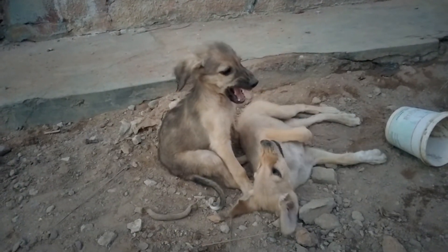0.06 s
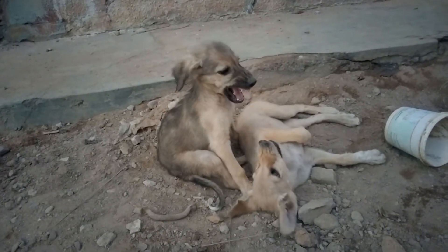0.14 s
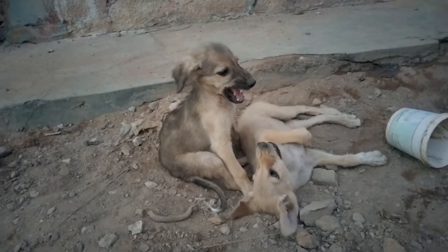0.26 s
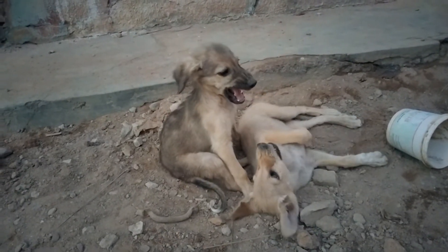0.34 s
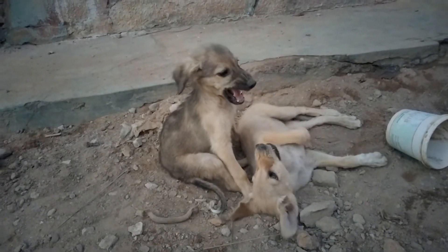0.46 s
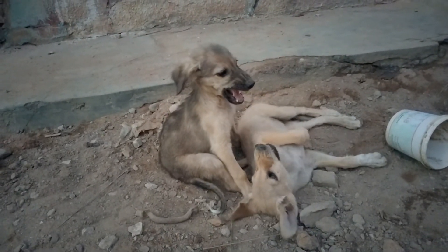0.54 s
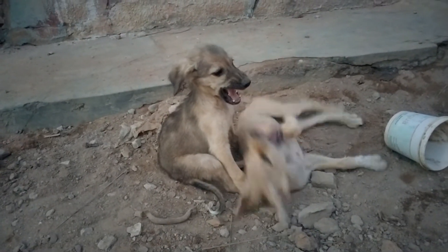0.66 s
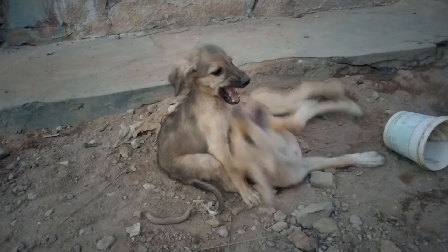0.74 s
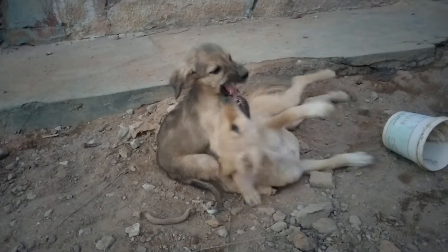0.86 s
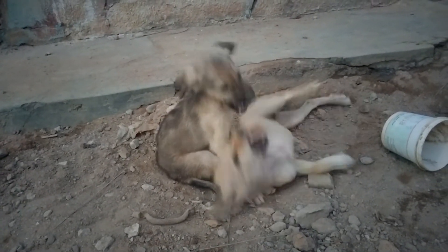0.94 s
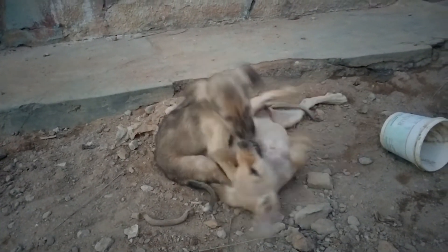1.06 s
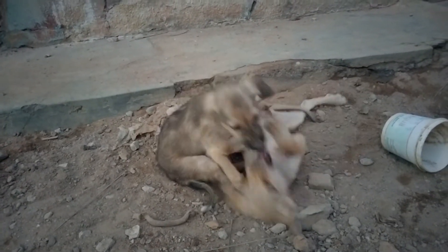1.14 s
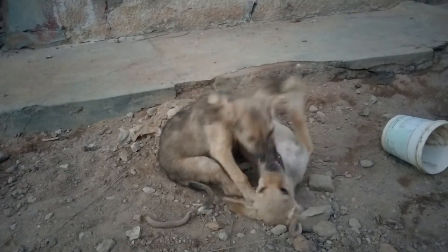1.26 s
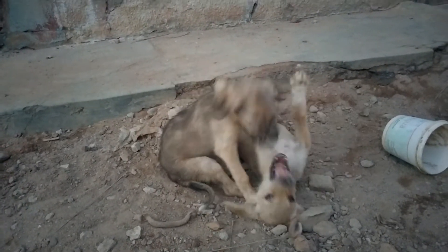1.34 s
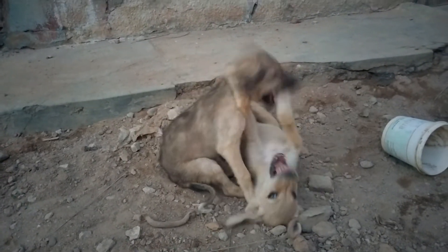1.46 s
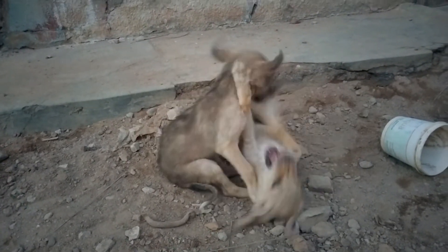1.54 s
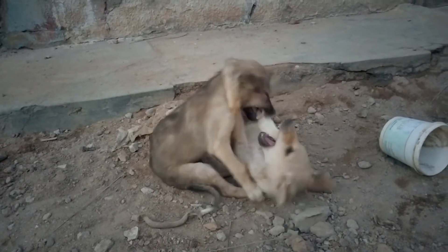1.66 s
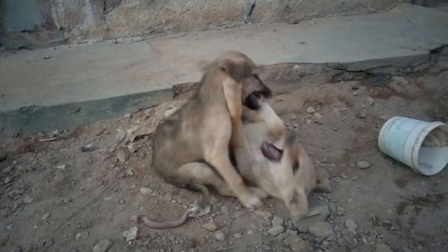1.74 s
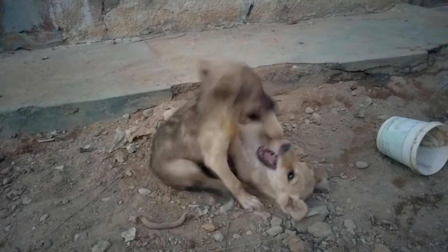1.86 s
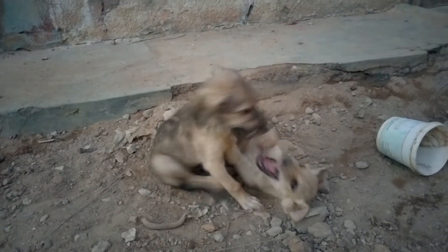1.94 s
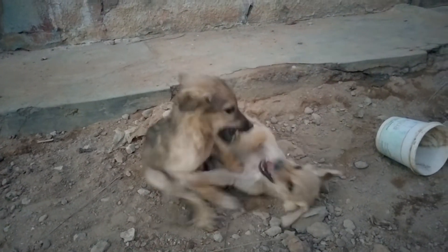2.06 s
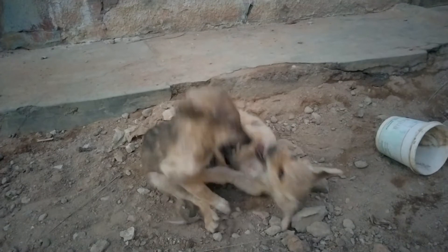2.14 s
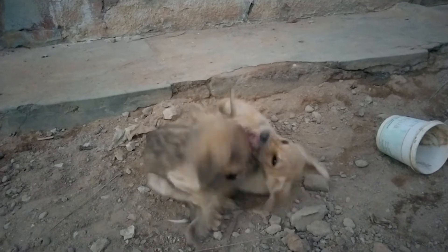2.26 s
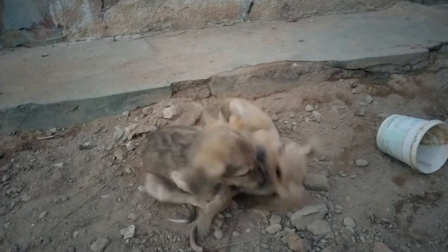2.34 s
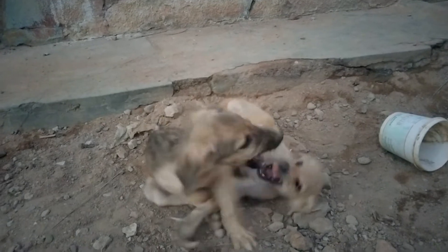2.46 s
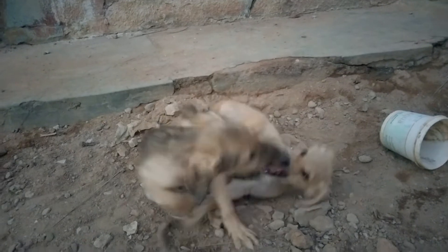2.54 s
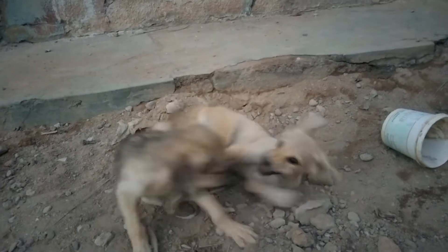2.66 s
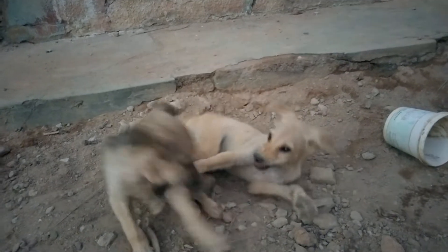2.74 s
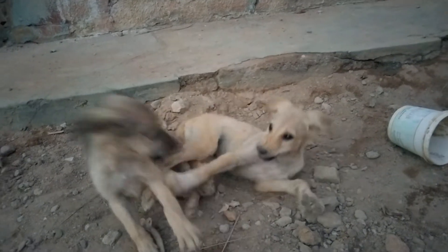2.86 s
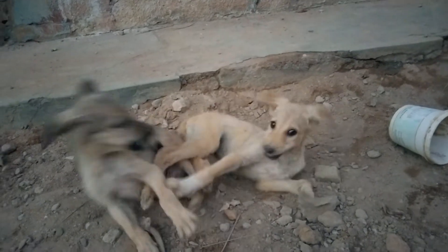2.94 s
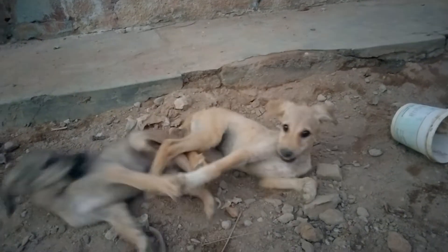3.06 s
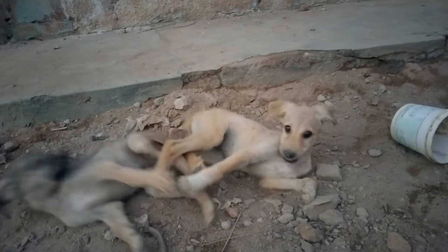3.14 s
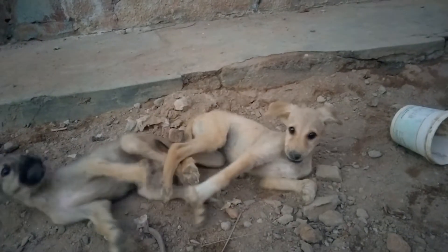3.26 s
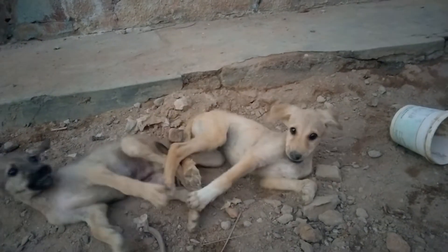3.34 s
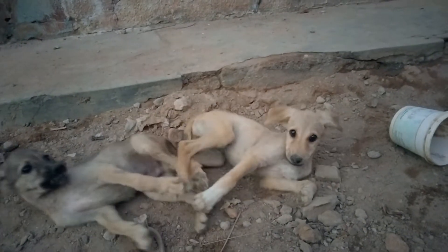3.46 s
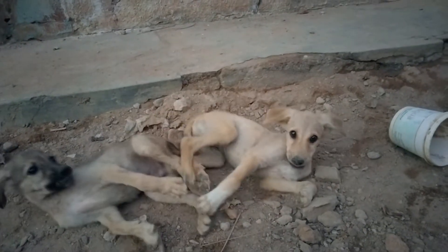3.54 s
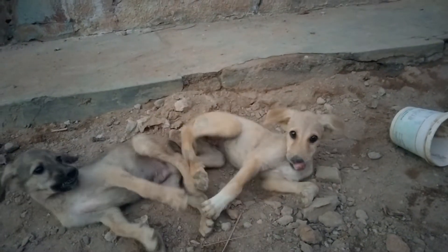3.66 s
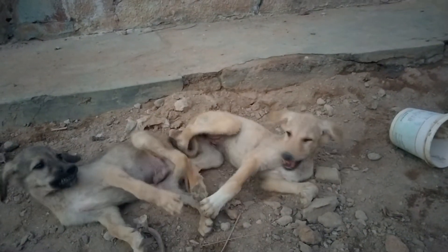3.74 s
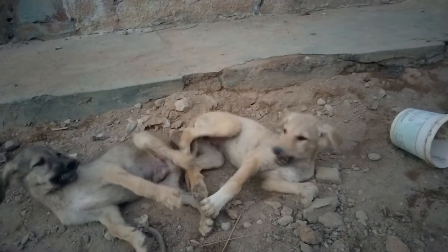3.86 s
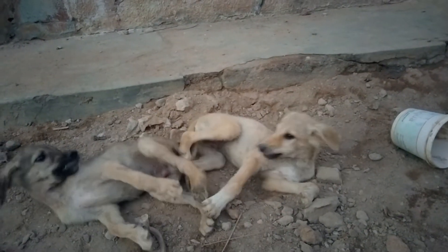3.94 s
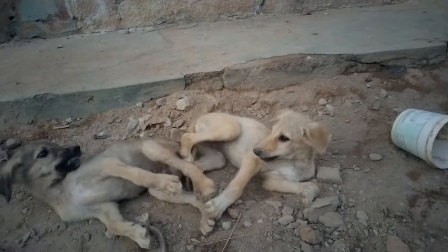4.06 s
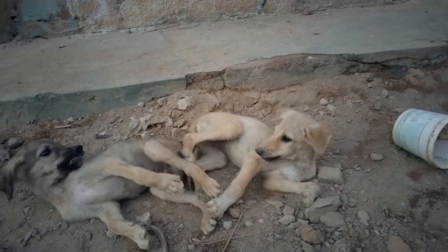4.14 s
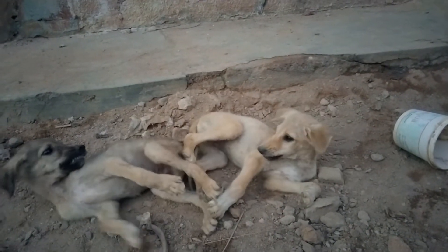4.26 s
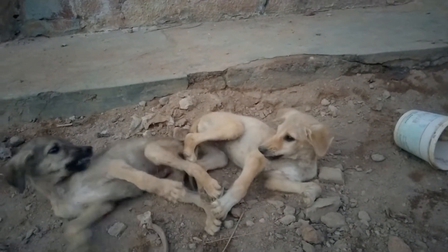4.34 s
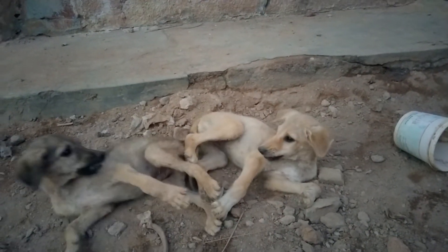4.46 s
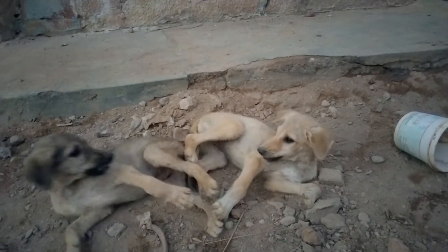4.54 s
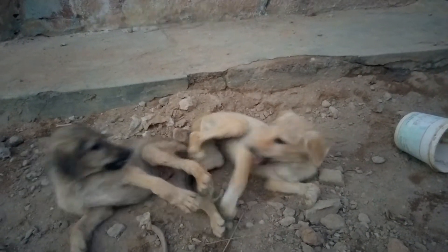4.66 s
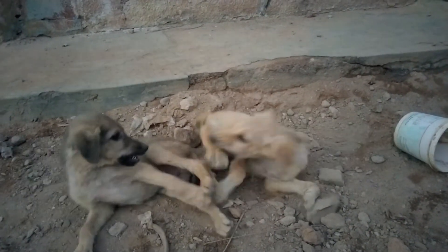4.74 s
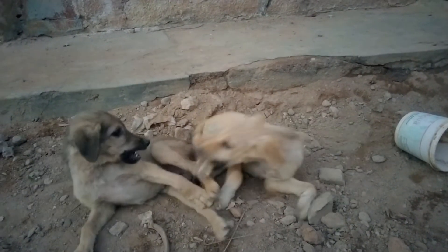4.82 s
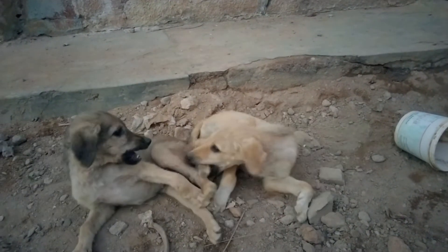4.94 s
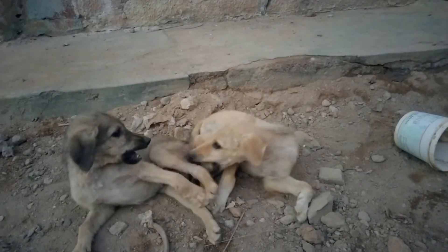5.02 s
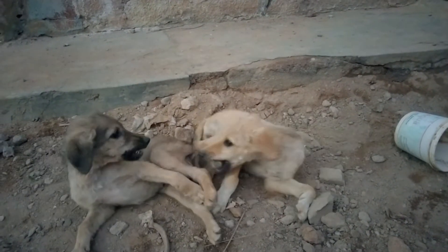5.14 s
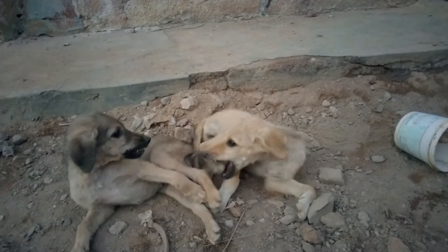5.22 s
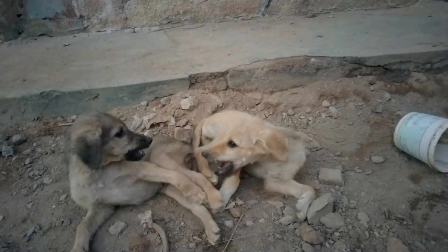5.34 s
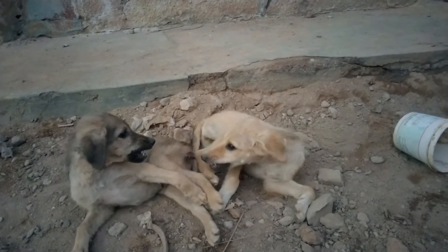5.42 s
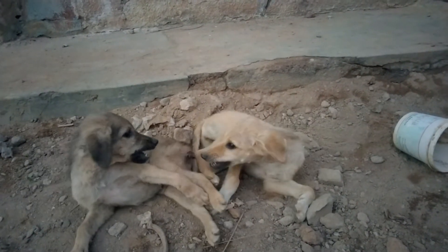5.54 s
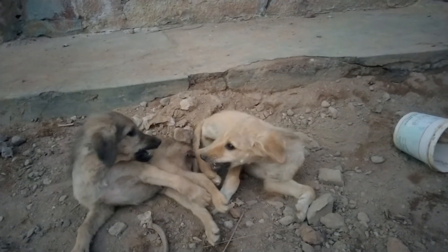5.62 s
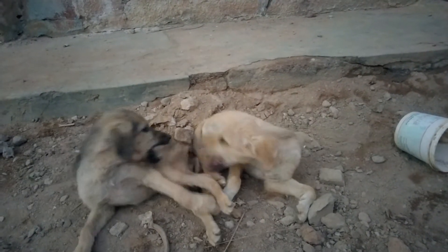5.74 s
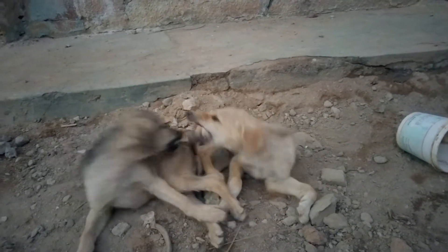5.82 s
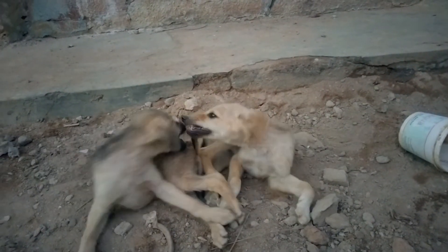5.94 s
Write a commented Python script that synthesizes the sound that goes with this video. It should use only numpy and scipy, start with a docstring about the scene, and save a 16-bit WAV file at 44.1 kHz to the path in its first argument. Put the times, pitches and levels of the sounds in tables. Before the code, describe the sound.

A quiet yard opens with soft low rumble, gentle hiss, a faint wavering hum and a thin flickering high whine. At about 0.45 s a puppy close to the microphone gives a sharp rising yelp that cracks into a yowl, then a lower, pulsing whine from 0.8 to 1.35 s with a faint airy whistle above it. A hoarse, climbing scream follows, then a piercing squeal until 1.9 s. After a tiny gap, bright yips at 2.05-2.25 s lead to a harsh cry that drops and breaks into a rattling growl around 2.55 s. Gritty scrapes continue to about 3.2 s, and soft dull kicks patter until 4 s in the lull. At 4.5 s a raspy bark collapses into a growl and faint snarl; a nasal moan rises and sinks from 5 s, a wail leaps up and cracks near 5.6 s, and a tiny high squeak ends it at 5.95 s. Little echo.

```python
"""Puppies wrestling in a yard

Two puppies wrestle on dry dirt beside a wall, close to a handheld camera. Their yelps, whines and squeals
are sums of harmonics through a throat and a moving mouth resonance; under strain, sidebands and chopped
noise split the voice. Some cries collapse into a rattling growl of separate puffs. Paws scuff the grit and
kick softly; the yard adds filtered-noise rumble and hiss, a low hum and a thin flickering whine."""
import sys
import numpy as np
from scipy import signal
from scipy.fft import rfft, irfft, next_fast_len
from scipy.io import wavfile
from scipy.ndimage import uniform_filter1d, minimum_filter1d, map_coordinates

SR = 44100
rng = np.random.default_rng(int(sys.argv[2]) if len(sys.argv) > 2 else 0)


def digitize_waveform(pressure):
    """Quantize a signal to 16-bit integers and store it at the path in sys.argv[1].

    Rows of a 2-D input are taken as channels; values are limited to [-1, 1].
    """
    field = np.atleast_2d(pressure).T
    bounded = np.clip(field, -1, 1)
    quanta = np.round(bounded * 32767).astype(np.int16)
    wavfile.write(sys.argv[1], SR, quanta)


N = 264150
TIME = np.arange(N) / SR
TOP_HZ = 15850  # upper band limit


def amp(db):
    """Level law: decibels to an amplitude factor."""
    return 10 ** (np.asarray(db) / 20)


def unit(x):
    """Normalisation: scale a signal to rms 1."""
    return x / np.sqrt(np.mean(x ** 2) + 1e-20)


def along(points, hz):
    """Logarithmic frequency scale: interpolate (Hz, value) points at hz."""
    f, v = np.transpose(points)
    return np.interp(np.log(hz + 1), np.log(f + 1), v)


def curves(rows, t):
    """Linear interpolation: read each column after the time at times t."""
    s, *columns = np.transpose(rows)
    return [np.interp(t, s, column) for column in columns]


def wobble(rate, t):
    """Band-limited randomness: a smooth random curve with rate knots a second."""
    place = (t - t[0]) * rate
    knots = rng.standard_normal(int(place[-1]) + 4)
    return map_coordinates(knots, [place], mode="nearest")


def gate(t, start, end, fade):
    """Raised-cosine window: 1 between start and end, with soft edges of fade seconds."""
    edge = np.clip(np.minimum(t - start, end - t) / fade, 0, 1)
    return np.sin(np.pi / 2 * edge) ** 2


def swells(rows):
    """Superposition of Gaussian bells from rows of (time in s, height, spread in s)."""
    return sum(height * np.exp(-.5 * ((TIME - s) / length) ** 2) for s, height, length in rows)


def filtered(x, gain):
    """Linear filtering: multiply the spectrum of x by a gain that depends on frequency."""
    size = next_fast_len(len(x) + SR // 20)
    spectrum = rfft(x, size) * gain(np.fft.rfftfreq(size, 1 / SR))
    return irfft(spectrum, size)[:len(x)]


def shelf(hz, db):
    """Directivity: a treble lift in dB, since a mouth that faces the camera sounds brighter."""
    return db * np.clip((hz - 4500) / 2500, 0, 1)


def noise(spectrum, treble_db=0, size=N):
    """Spectral shaping: white noise filtered to a coloured noise of rms 1."""
    white = rng.standard_normal(size)
    return unit(filtered(white, lambda hz: amp(along(spectrum, hz) + shelf(hz, treble_db))))


# Levels of the yard. Each row: time in seconds, rumble in dB, hiss in dB before its slow drift.
YARD_LEVELS = [(0, -48.5, -50), (1.7, -53.5, -56), (2.8, -51, -55), (3.9, -55.5, -58), (5.99, -54.5, -55)]
# Level of a wavering low hum. Each row: time in seconds, rms level in dB.
HUM_LEVELS = [(0, -61), (1.3, -51), (1.6, -62.5), (5.99, -59.5)]
# Colour of the rumble. Each row: frequency in hertz, relative level in dB.
RUMBLE_COLOUR = [(12, -40.5), (20, 2), (37, -4), (65, -2.5), (114, -3), (135, 0), (176, -9), (231, -10.5),
                 (375, -12), (420, -11.5), (464, -17), (600, -24.5), (780, -59.5), (1320, -120)]
# Colour of the hiss. Each row: frequency in hertz, relative level in dB.
HISS_COLOUR = [(290, -36.5), (500, -12.5), (586, -15), (851, -3), (927, -9.5), (1720, -10), (2070, -13.5),
               (2840, -13), (3430, -18.5), (5050, -22.5), (6450, -19), (7030, -13.5), (7670, -10.5),
               (12900, -32.5), (15500, -23)]
# The thin whine. Each row: frequency in hertz, level in dB before the common swell.
THIN_TONES = [(2950, -69), (7246, -59.5), (10896, -73), (12269, -72), (13800, -80.5)]


def flickering_tone(hz, rate):
    """Random modulation: a carrier whose amplitude and phase wander, at rms 1."""
    envelope = 1 + wobble(rate, TIME) + 1j * wobble(rate, TIME)
    return unit(np.real(envelope * np.exp(2j * np.pi * hz * TIME)))


def yard(tones_db=2, hum_hz=121, flicker_rate=28):
    """Stationary background: shaped noise for rumble and hiss, sines for the hum and thin whine."""
    rumble_db, hiss_db = curves(YARD_LEVELS, TIME)
    hum_db, = curves(HUM_LEVELS, TIME)
    rumble = amp(rumble_db) * noise(RUMBLE_COLOUR)
    hum_phase = 2 * np.pi * hum_hz * TIME + 1.3 * wobble(16, TIME)
    hum = np.sqrt(2) * amp(hum_db) * np.sin(hum_phase)
    hiss = amp(hiss_db + .8 * wobble(6, TIME)) * noise(HISS_COLOUR)
    tones = sum(amp(db) * flickering_tone(hz, flicker_rate) for hz, db in THIN_TONES)
    # The thin tones swell and sink together with the hiss.
    swell = amp(hiss_db - hiss_db.mean() + tones_db)
    return rumble + hiss + hum + swell * tones


# Decay of the yard's echo. Each row: frequency in hertz, time to fall by 60 dB in seconds.
ECHO_DECAY = [(200, 0.54), (2000, 0.43), (5000, 0.23), (12000, 0.099)]


def walls(x, delay=.012):
    """Diffuse reverberation: the walls around the yard answer with a short decaying tail of noise."""
    hz, t, cells = signal.stft(rng.standard_normal(SR // 2), SR, nperseg=256)
    decay = amp(-60 * t / along(ECHO_DECAY, hz)[:, None])
    tail = signal.istft(cells * decay, SR, nperseg=256)[1]
    tail = np.pad(tail / np.linalg.norm(tail), (int(delay * SR), 0))
    return signal.fftconvolve(x, tail)[:N]


# Legs kicking softly on the ground during the lull
KICK_START_S, KICK_GAP_S, KICK_SCATTER_S, KICK_DB = 3.17, 0.088, 0.0255, -48.5


def thuds(hz=85, decay=0.0249, count=10):
    """Damped oscillation: each kick gives the packed earth one dull, quickly damped push."""
    out = np.zeros(N)
    for k, (late, detune) in enumerate(rng.standard_normal((count, 2))):
        s = KICK_START_S + KICK_GAP_S * k + KICK_SCATTER_S * late
        age = np.maximum(TIME - s + decay, 0) / decay  # in decay times; the push peaks at 1
        push = age * np.exp(1 - age)
        kick_hz = hz * np.exp(0.151 * detune)
        out += amp(KICK_DB) * push * np.sin(2 * np.pi * kick_hz * age * decay)
    return out


# Paws and backs dragging on grit. Each row: centre in seconds, level in dB, spread in seconds.
SCUFF_STROKES = [(1.94, -47, 0.1), (2.622, -37, 0.027), (2.914, -53.5, 0.052), (3.033, -44, 0.027),
                 (3.207, -47, 0.071), (3.452, -56, .04), (3.949, -54.5, .07), (4.788, -56, 0.03)]
# Colour of the sliding grit. Each row: frequency in hertz, relative level in dB.
GRIT_COLOUR = [(290, -40), (500, -9.5), (815, -8.5), (1490, -15.5), (2010, -3.5), (3190, -12), (4130, -3.5),
               (6000, -16.5), (8240, 1.5), (12100, -17.5), (15500, -9.5)]


def scuffs():
    """Granular friction: grit slides in clumps of tiny grains, heard as unevenly modulated noise."""
    stroke = swells((s, amp(db), length) for s, db, length in SCUFF_STROKES)
    clumps = amp(3 * wobble(500, TIME))
    return stroke * unit(noise(GRIT_COLOUR) * clumps)


# A soft snarl behind closing jaws links the bark to the moan.
# Each row: time in seconds, mouth level in dB, chest level in dB.
SNARL_LEVELS = [(4.61, -61, -74), (4.66, -43, -44.5), (4.78, -37, -46.5), (4.89, -55, -53.5),
                (4.95, -49, -45.5), (5.029, -22.5, -45.5)]
# Colour through the chest. Each row: frequency in hertz, relative level in dB.
CHEST_COLOUR = [(120, -12), (250, 0.5), (370, 0), (520, -7), (720, 1), (1000, -8.5), (1800, -6),
                (4000, -49)]
# Colour of a dark growl, also used by growls(). Each row: frequency in hertz, relative level in dB.
DARK_GROWL = [(250, -46), (700, -71), (1200, -5.5), (1600, -3.5), (1880, 10.5), (2150, -2), (2600, -6.5),
              (3700, -8), (4500, -26.5), (6000, -38), (8000, -10.5), (10000, -31), (15500, -39)]


def snarl():
    """Amplitude modulation: loose folds keep fluttering softly, heard through the mouth and the chest."""
    mouth_db, chest_db = curves(SNARL_LEVELS, TIME)
    flutter = unit(amp(1.485 * wobble(160, TIME)))
    sound = amp(mouth_db) * noise(DARK_GROWL) + amp(chest_db) * noise(CHEST_COLOUR)
    return sound * flutter * gate(TIME, SNARL_LEVELS[0][0], SNARL_LEVELS[-1][0], .01)


# Thin whistles above the voice, one list for each.
# Each row: time in seconds, frequency in hertz, level in dB before flicker.
WHISTLE_TRACKS = [
    [(.73, 10800, -46), (.84, 11100, -36), (1.14, 11200, -32.5), (1.18, 10700, -33)],
    [(2.16, 9170, -41), (2.21, 9180, -32), (2.272, 9050, -35.5), (2.289, 9130, -14.5), (2.312, 8710, -35.5),
     (2.39, 8300, -43)],
    [(5.875, 11800, -42), (5.945, 11500, -37.5), (5.99, 12050, -29.5)],
]
# Colour of the air past the whistle. Each row: frequency in hertz, relative level in dB.
JET_COLOUR = [(3000, -48.5), (6500, -16.5), (8300, -2), (10000, -6), (11200, -5.5), (12500, -16),
              (15500, -13.5)]


def whistles(jet_db=-10):
    """Aerodynamic whistle: a whining puppy adds a tone far above its voice, in a hiss of air."""
    out = np.zeros(N)
    jet = amp(jet_db) * noise(JET_COLOUR)
    for rows in WHISTLE_TRACKS:
        hz, db = curves(rows, TIME)
        unsteady_hz = hz * (1 + 0.0029 * wobble(170, TIME))
        phase = 2 * np.pi * np.cumsum(unsteady_hz) / SR
        tone = np.sqrt(2) * amp(2.3 * wobble(70, TIME)) * np.sin(phase)
        out += amp(db) * (tone + jet) * gate(TIME, rows[0][0], rows[-1][0], 0.0057)
    return out


# Rattles of slack vocal folds. Each row: loudest slap in seconds, time between slaps in seconds,
# level of that slap in dB, spread of a slap in seconds, brightness from 0 to 1.
GROWL_RATTLES = [(2.568, .0175, -23.5, .005, .95), (4.663, .0157, -16, 0.0035, 0)]
# Colour of a growl from open jaws. Each row: frequency in hertz, relative level in dB.
OPEN_GROWL = [(100, -22), (320, 1), (600, -3.5), (1300, 1.5), (2400, -1), (3800, -1), (5500, -33),
              (7900, -9), (10500, -30.5), (15500, -14)]
GROWL_RISE_DB, GROWL_FALL_DB = 3, 4.2  # from slap to slap, before and after the loudest


def growls(count=8, rising_count=2):
    """Pulse excitation: slack folds slap about sixty times a second, each a puff through the mouth."""
    dark, bright = noise(DARK_GROWL), noise(OPEN_GROWL)
    k = np.arange(count) - rising_count
    slap_db = np.minimum(GROWL_RISE_DB * k, -GROWL_FALL_DB * k)
    out = np.zeros(N)
    for s, gap, db, length, brightness in GROWL_RATTLES:
        puffs = swells((at, height, length) for at, height in zip(s + gap * k, amp(db + slap_db)))
        share = np.clip(brightness, 0, 1)
        out += puffs * (np.sqrt(1 - share ** 2) * dark + share * bright)
    return out


# The mouth's resonance climbs as the jaws open; its half-width is in octaves.
MOUTH_SHUT_HZ, MOUTH_OPEN_HZ, MOUTH_DB, MOUTH_OCTAVES = 1300, 3473, 17, .3


def mouth(hz, opening):
    """Resonance: the lift in dB is greatest for whichever harmonic lies nearest the mouth's centre."""
    centre = MOUTH_SHUT_HZ * (MOUTH_OPEN_HZ / MOUTH_SHUT_HZ) ** opening
    return MOUTH_DB / (1 + (np.log2(hz / centre) / MOUTH_OCTAVES) ** 2)


BLUR_REFERENCE_HZ = 9100  # phase blur grows with frequency squared, relative to this
FLICKER_DOUBLES_HZ = 6900  # high partials beam more narrowly, so they flicker more


def partials(multiples, pitch, phase, spectrum, treble_db, lift_db=0, blur_s=0, scatter_db=2.56):
    """Additive synthesis: sines at multiples of a moving pitch, flickering as the head turns; rms 1."""
    k, t = multiples[:, None], TIME[:len(pitch)]
    hz = k * pitch
    drift = np.array([wobble(34.4, t) for _ in multiples])
    flicker_db = scatter_db * (1 + hz / FLICKER_DOUBLES_HZ) * drift
    weight = amp(along(spectrum, hz) + shelf(hz, treble_db) + lift_db + flicker_db) * (hz < TOP_HZ)
    # Throat and ground delay each partial differently, which smears the pulses.
    lag = 2 * np.pi * rng.random(k.shape)
    # Cycle-to-cycle unevenness blurs the highest overtones and leaves the low ones clean.
    lag = lag + 2 * np.pi * blur_s * wobble(1200, t) * hz ** 2 / BLUR_REFERENCE_HZ
    total = (weight * np.sin(k * phase + lag)).sum(0)
    return np.sqrt(2) * total / np.sqrt((weight ** 2).sum(0) + 1e-20)


# Throat and mouth. Each row: frequency in hertz, relative level in dB.
THROAT = [(300, -29), (720, -5), (1000, 1), (1400, -3.5), (1800, 4), (2200, 1), (2650, -2), (3200, -8.5),
          (3600, -3.5), (4000, -2.5), (4400, -12.5), (5350, -25), (6600, -29.5), (7300, -13.5), (9000, -16),
          (13000, -31.5)]
# Colour of the rasp. Each row: frequency in hertz, relative level in dB.
RASP_COLOUR = [(100, -49.5), (650, -45.5), (1050, -10), (1600, -9.5), (2300, 5), (3700, 3.5), (4500, -6.5),
               (5300, -22.5), (6400, -28), (7500, -13.5), (9000, -19), (11500, -29), (15500, -21.5)]
# Colour of air past the teeth. Each row: frequency in hertz, relative level in dB.
TEETH_COLOUR = [(4000, -40), (6500, -19.5), (8300, 3), (11000, -6.5), (15500, -10)]
# Strained spells with a second, slower vibration. Each row: start in seconds, end in seconds,
# its rate over the pitch, its share of the rasp from 0 to 1, rasp in dB relative to the voice.
STRAINED_SPELLS = [(.575, .6, .5, .1, -15), (0.614, 0.745, .5, 0, -13.5), (1.366, 1.482, 0.22, 0.65, -6.5),
                   (1.47, 1.543, .333, 0.94, -2), (1.676, 1.75, 0.59, 0.68, -12),
                   (2.052, 2.144, 0.59, 0.6, -14.5), (2.339, 2.466, 0.25, .65, -6.5),
                   (2.454, 2.535, .5, .3, -11.5), (4.519, 4.578, .38, .72, -2), (4.961, 5.027, 0.44, 0, -2),
                   (5.374, 5.425, .5, .1, -5.5), (5.659, 5.727, 0.44, 0, -6.5)]
# The voice swells or is briefly choked as the bodies shove.
# Each row: centre in seconds, gain in dB, spread in seconds.
PUSHES = [(.946, 8.5, .012), (.977, -11, .009), (1.022, 7.5, 0.028), (1.092, -6.5, .012),
          (1.232, 8.5, .019), (2.11, -6.5, .004), (5.125, 2.5, .014)]
CHOP_HZ, CHOP_DEPTH = 281.2, 0.93  # under strain the throat flaps and chops the rasp into bursts


def call(rows, jitter, rasp_db, first_db, overtone_db, treble_db, hiss_db, throat=THROAT,
         strain_jitter=0.013, shimmer_db=1.5, teeth_db=-36, blur_s=4e-6):
    """Source and filter: folds vibrate at the pitch, less evenly under strain, and chop turbulent air."""
    span = (TIME >= rows[0][0]) & (TIME <= rows[-1][0])
    t = TIME[span]
    pitch, level_db, opening = curves(rows, t)
    spells = [(amp(db) * gate(t, start, end, 0.018), ratio, np.clip(share, 0, 1))
              for start, end, ratio, share, db in STRAINED_SPELLS
              if t[0] < (start + end) / 2 < t[-1]]
    strain = amp(rasp_db) + sum(rasp * np.sqrt(1 - share) for rasp, _, share in spells)
    pitch = uniform_filter1d(pitch, size=200, mode="nearest")
    strain_wobble = strain_jitter * np.tanh(strain) * wobble(600, t)
    pitch = pitch * (1 + jitter * wobble(130, t) + strain_wobble)
    phase = 2 * np.pi * np.cumsum(pitch) / SR

    harmonics = np.arange(1, int(TOP_HZ / pitch.min()) + 1)
    k = harmonics[:, None]
    lift_db = mouth(k * pitch, opening) + first_db * (k == 1) + overtone_db * (k > 2)
    shimmer = amp(shimmer_db * wobble(90, t))
    voice = shimmer * partials(harmonics, pitch, phase, throat, treble_db, lift_db, blur_s)

    # A second, unsteady vibration puts a sideband on either side of each of the low harmonics;
    # the rest of the rasp is noise.
    turbulence = amp(rasp_db)
    low = np.arange(1, 9)
    for rasp, ratio, share in spells:
        sides = sum(partials(low + sign * ratio, pitch, phase + .2 * wobble(220, t), RASP_COLOUR, hiss_db)
                    for sign in (-1, 1))
        voice += rasp * np.sqrt(share / 2) * sides
        chop = unit(1 + CHOP_DEPTH * np.sin(2 * np.pi * CHOP_HZ * t + wobble(80, t)))
        turbulence = turbulence + rasp * np.sqrt(1 - share) * chop
    fold_opening = unit(1 + 0.11 * np.sin(phase))
    voice += turbulence * noise(RASP_COLOUR, hiss_db, size=len(t)) * fold_opening
    # A loud cry also drives a fine hiss past the teeth.
    voice += amp(teeth_db) * noise(TEETH_COLOUR, size=len(t))

    out = np.zeros(N)
    level = amp(level_db + swells(PUSHES)[span])
    out[span] = level * voice * gate(t, t[0], t[-1], 0.0035)
    return out


# The calls in these tables share their columns. Each row: time in seconds, pitch in hertz before jitter,
# level in dB before shimmer and pushes, mouth opening from 0 to 1.
YELP = [(.426, 644, -36, 0.2), (.445, 1013, -33, 0.94), (.466, 1202, -11, 0.42), (.497, 1325, -17, .7),
        (.518, 1397, -6, 0.2), (.545, 1303, -26, 1), (.586, 1279, -14, 0.47), (.63, 1341, -18.5, 0.38),
        (.657, 1140, -27, 0)]
YOWL = [(.632, 946, -17, 0.24), (.668, 1176, -15.5, 0.88), (.687, 1283, -18.5, 0.88),
        (.693, 1632, -23.5, 0.49), (.72, 1776, -22, 1), (.75, 1712, -28, 1), (.777, 1720, -29, .6)]
WHINE = [(.76, 860, -31, 0.16), (.805, 970, -28.5, 0.4), (.835, 896, -26.5, 0.37), (.885, 990, -38, 0.64),
         (.93, 799, -29.5, 0.49), (1.066, 745, -26, 0.43), (1.088, 981, -28, 0.52), (1.128, 753, -23, 0.6),
         (1.29, 703.4, -24, 0.65), (1.315, 648, -16, 0.41), (1.358, 775, -18.5, .5)]
SCREAM = [(1.354, 770, -17, 0.28), (1.368, 876, -11, 0.44), (1.388, 1224, -25.5, 0.4),
          (1.41, 1432, -16.5, 0.4), (1.455, 1533, -23.5, 0.78), (1.48, 1448, -8.5, 0.99),
          (1.51, 1603, -20, 0.46), (1.535, 1565, -17.5, 0.56), (1.562, 1790, -13.5, 0.56),
          (1.587, 1670, -32, 0.86)]
SQUEAL = [(1.621, 1752, -16.5, 0.83), (1.647, 1748, -8, 0.87), (1.661, 1616, -16.5, 1),
          (1.684, 1692, -9, 0.61), (1.697, 1610, -19.5, 0.84), (1.73, 1765, -14, 0.41),
          (1.775, 1812, -13, .68), (1.868, 1793, -9, 0.49), (1.888, 1700, -26, 0.73)]
YIP = [(2.042, 1474, -11.5, 0.13), (2.056, 1573, -9.5, 0.29), (2.085, 1462, -13, 0.16),
       (2.152, 1834, -8.5, 0.63), (2.173, 1742, -24.5, 0.51), (2.195, 1840, -12, 0.74),
       (2.22, 1817, -12, 0.77), (2.242, 1720, -37.5, 0.59)]
CRY = [(2.288, 1718, -22, 0.46), (2.303, 1746, -7.5, 0.53), (2.366, 1700, -14.5, .65),
       (2.405, 1674, -19.5, .55), (2.435, 1556, -25, 0.56), (2.444, 1173, -11.5, 0.64),
       (2.476, 1238, -8.5, 0.87), (2.492, 1115, -29.5, .9), (2.53, 706, -29.5, 0.98)]
# A second voice under two of the cries, one list for each, with the columns of the calls.
UNDERTONES = [
    [(.63, 1073, -39, .3), (.655, 873, -39.5, 0.8), (.684, 655, -32, .4)],
    [(2.328, 937, -36.5, .05), (2.39, 1062, -30, .05), (2.428, 1018, -27, 0.45), (2.447, 890, -30.5, 0.26)],
]
# A second tone that beats against the cry, with the columns of the calls.
BEATING = [(2.35, 1373, -26.5, .1), (2.375, 1488, -16.5, .1), (2.402, 1523, -17, .1),
           (2.428, 1440, -28.5, 0.11)]
BARK = [(4.501, 1351, -18, 0.072), (4.521, 1409, -16.5, 0.48), (4.545, 1472, -8.5, 0.53),
        (4.568, 1500, -9.5, 0.18), (4.58, 1505, -19.5, 0.87), (4.59, 1134, -30.5, 0.36),
        (4.606, 830, -26.5, 0.22), (4.617, 726, -38, .4), (4.634, 658, -13, .42)]
# A low, closed-mouth note, with the columns of the calls.
GRUMBLE = [(4.85, 372.4, -55, 0), (4.9, 361.4, -47, 0), (4.985, 344, -55, 0)]
MOAN = [(4.96, 348, -52.5, .3), (4.976, 402, -41.5, 0.27), (5.0, 507.3, -36, 0.25),
        (5.035, 705, -25.5, 0.42), (5.062, 721, -25, 0.64), (5.09, 614, -24, 0.46),
        (5.135, 446.6, -33, 0.37), (5.16, 368.5, -32, 0.35), (5.187, 318.2, -27.5, 0.4),
        (5.3, 324, -33, 0.51), (5.372, 344, -41, 0.13)]
WAIL = [(5.368, 379.7, -38.5, 0.2), (5.412, 541, -32.5, 0.3), (5.43, 719.8, -26.5, 0.64),
        (5.535, 707.6, -27.5, 0.62), (5.562, 880, -27, 0.28), (5.608, 1453, -21, 0.53),
        (5.64, 1491, -19.5, 0.54), (5.676, 1353, -22.5, 0.62), (5.696, 821, -22.5, 0.26),
        (5.73, 674, -36, 0.38), (5.79, 640, -65, 0.11)]
SQUEAK = [(5.912, 1580, -36, .2), (5.929, 1720, -11.5, 0.26), (5.947, 1643, -8.5, 0.38),
          (5.972, 1373, -33, 0.32)]
# The throat with the jaws nearly closed. Each row: frequency in hertz, relative level in dB.
TIGHT_THROAT = [(300, -0.5), (650, -4), (950, -6), (1300, -1.5), (1550, -7), (1900, -1.5), (2200, -4.5),
                (2700, -5), (3200, 1.5), (3600, 3.5), (4000, -9.5), (4300, -1), (4900, -14), (6200, -41),
                (7300, -8.5), (9500, -14), (13000, -32)]


def cries():
    """Superposition: all the voiced calls of the tussle add, each with its own voice quality."""
    out = call(YELP, jitter=0.0055, rasp_db=-31, first_db=3, overtone_db=-5,
               treble_db=-1.5, hiss_db=-3.5, blur_s=6e-6)
    out += call(YOWL, jitter=.004, rasp_db=-23, first_db=0.5, overtone_db=2.5,
                treble_db=-10, hiss_db=-5.5)
    out += call(WHINE, jitter=.003, rasp_db=-22.5, first_db=0, overtone_db=0.5,
                treble_db=-6.5, hiss_db=-1, blur_s=7e-6)
    out += call(SCREAM, jitter=0.0073, rasp_db=-29.5, first_db=-6.5, overtone_db=1,
                treble_db=-15.5, hiss_db=1.5)
    out += call(SQUEAL, jitter=0.0034, rasp_db=-34.5, first_db=2, overtone_db=-7.5,
                treble_db=2, hiss_db=-5.5, blur_s=2.5e-6)
    out += call(YIP, jitter=.003, rasp_db=-30, first_db=-5, overtone_db=-11.5,
                treble_db=4.0, hiss_db=-7)
    out += call(CRY, jitter=0.0031, rasp_db=-34.5, first_db=-3.5, overtone_db=-1.5,
                treble_db=-5.5, hiss_db=-1, blur_s=8e-6)
    for rows in UNDERTONES:
        out += call(rows, jitter=0.033, rasp_db=-13, first_db=6, overtone_db=-2.5,
                    treble_db=-12.5, hiss_db=-6.5)
    out += call(BEATING, jitter=0.0046, rasp_db=-28, first_db=2.5, overtone_db=-6,
                treble_db=-7.5, hiss_db=-6)
    out += call(BARK, jitter=0.0026, rasp_db=-19, first_db=-0.5, overtone_db=-4.5,
                treble_db=4, hiss_db=8)
    out += call(GRUMBLE, throat=TIGHT_THROAT, jitter=.01, rasp_db=-22, first_db=29, overtone_db=0,
                treble_db=-10, hiss_db=-3)
    out += call(MOAN, throat=TIGHT_THROAT, jitter=0.0016, rasp_db=-15, first_db=5.5, overtone_db=4,
                treble_db=-9, hiss_db=8.5, teeth_db=-34.5, blur_s=9e-6)
    out += call(WAIL, throat=TIGHT_THROAT, jitter=.0015, rasp_db=-29.5, first_db=3, overtone_db=-0.5,
                treble_db=-2.5, hiss_db=3, teeth_db=-31.5, blur_s=6e-6)
    out += call(SQUEAK, jitter=0.0011, rasp_db=-36, first_db=-5.5, overtone_db=-14,
                treble_db=0.5, hiss_db=-2.5)
    return out


def scene():
    """Superposition: the puppies, their echo and the yard add at one point."""
    puppies = thuds() + scuffs() + snarl() + whistles() + growls() + cries()
    return (yard() + amp(-22) * walls(puppies) + puppies)[None]


def record(dry, ceiling=0.43):
    """Peak limiting and band limiting: the camera holds the peaks down and passes nothing above TOP_HZ."""
    x = dry[0]
    needed = np.minimum(1, ceiling / (np.abs(x) + 1e-9))
    gain = uniform_filter1d(minimum_filter1d(needed, size=130), size=130)
    return filtered(x * gain, lambda hz: hz < TOP_HZ)[None]


dry = scene()
out = record(dry)
digitize_waveform(out)
```